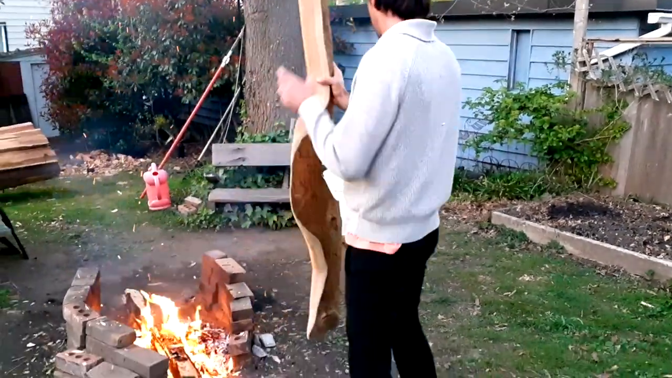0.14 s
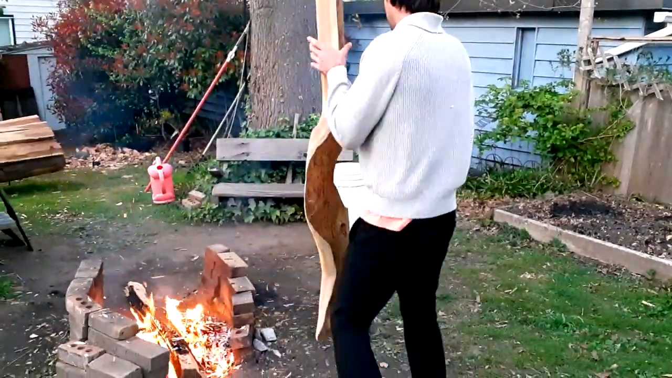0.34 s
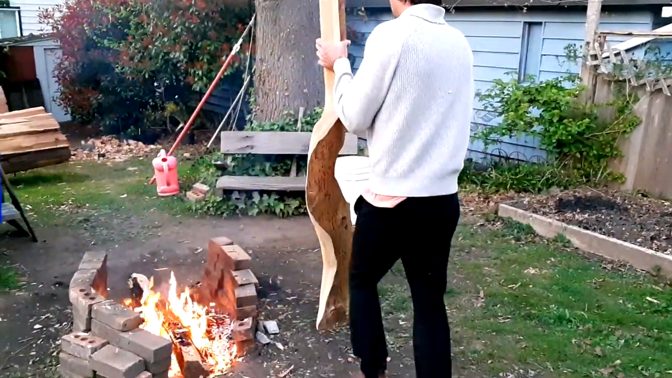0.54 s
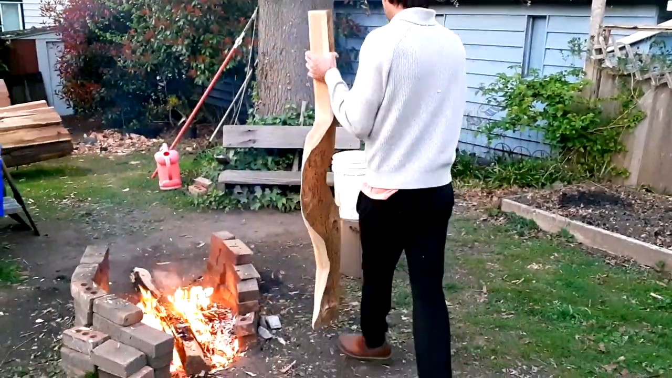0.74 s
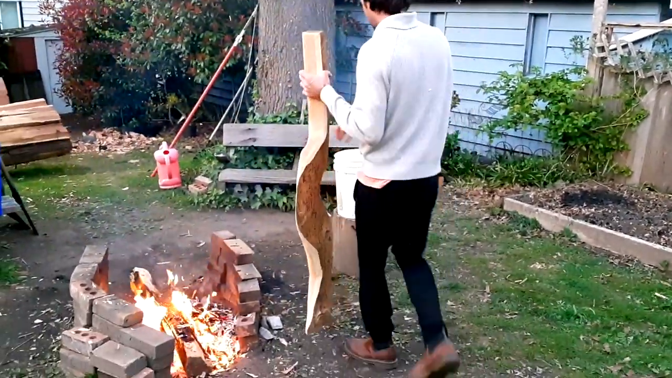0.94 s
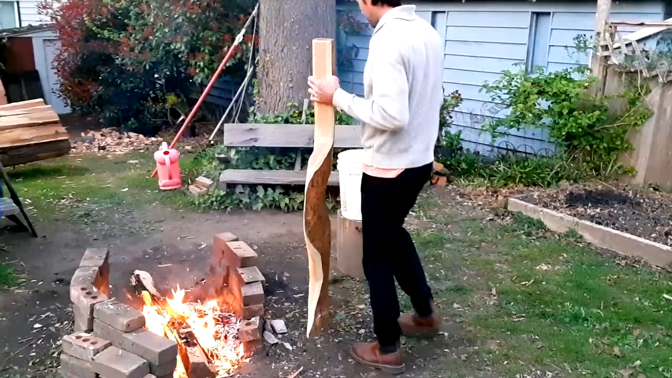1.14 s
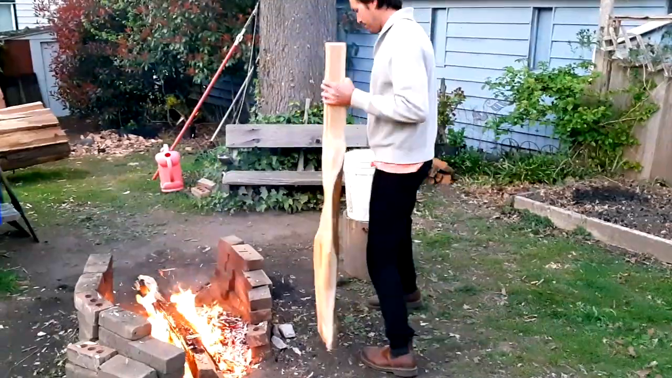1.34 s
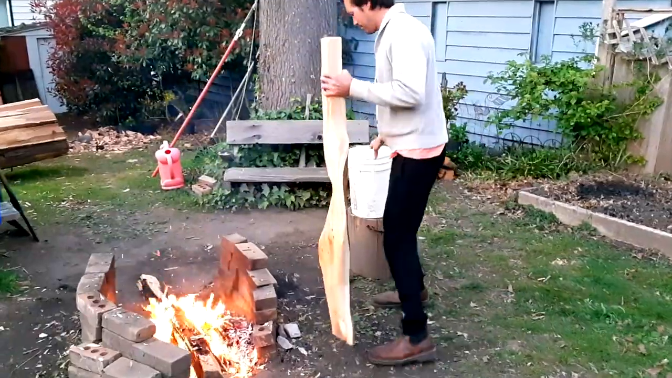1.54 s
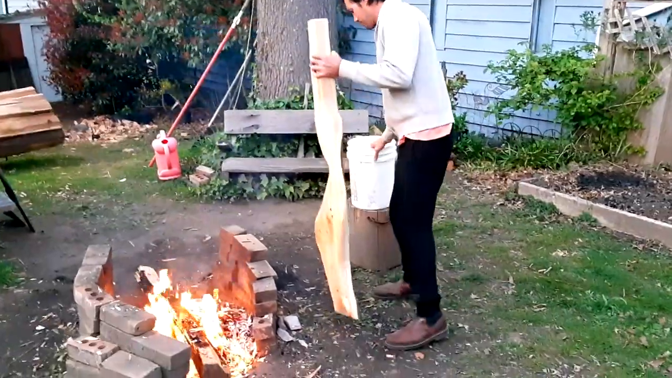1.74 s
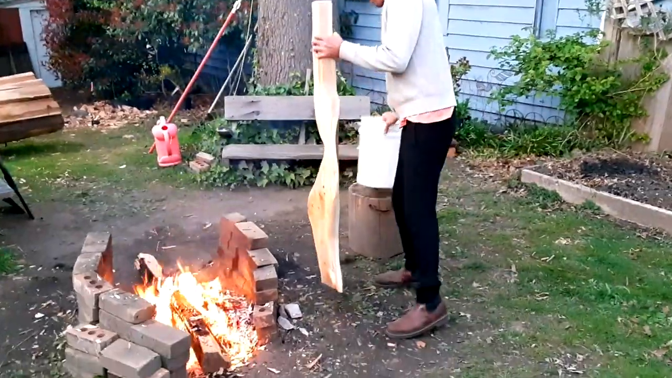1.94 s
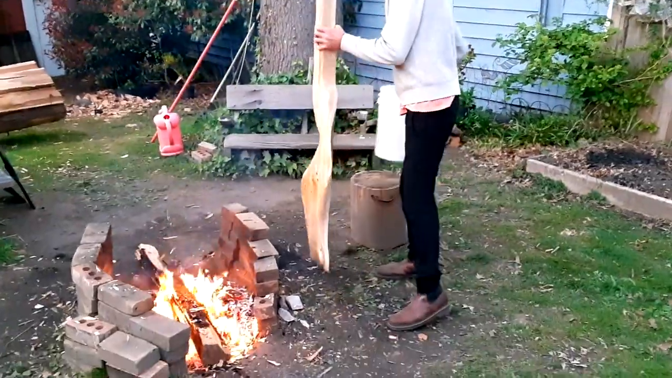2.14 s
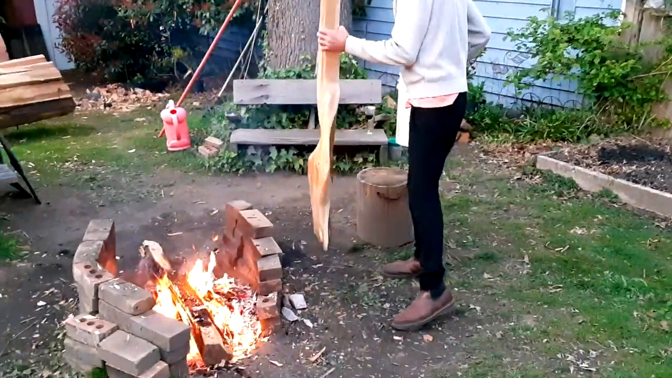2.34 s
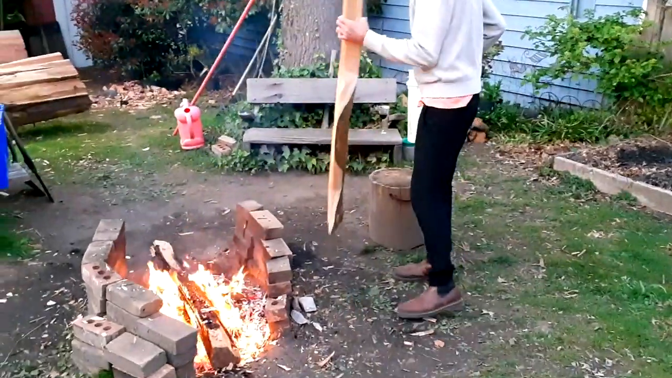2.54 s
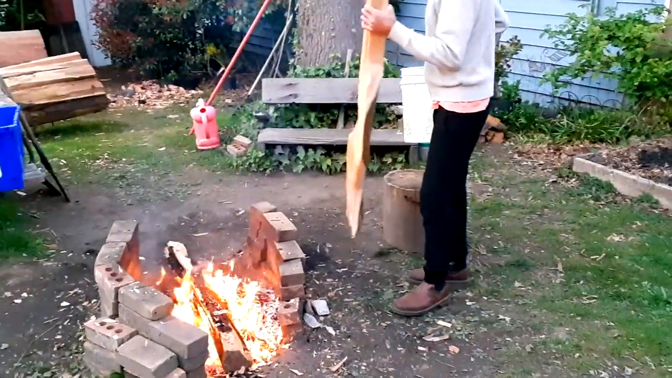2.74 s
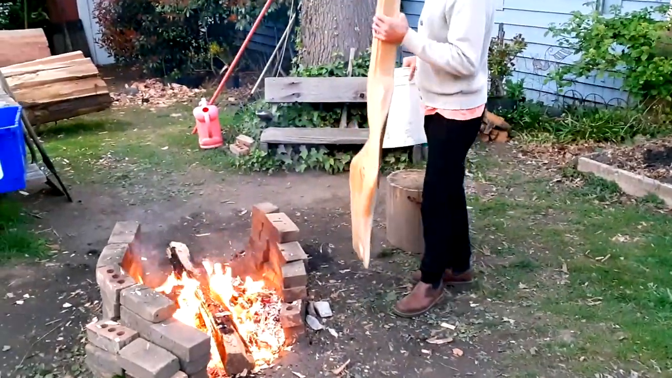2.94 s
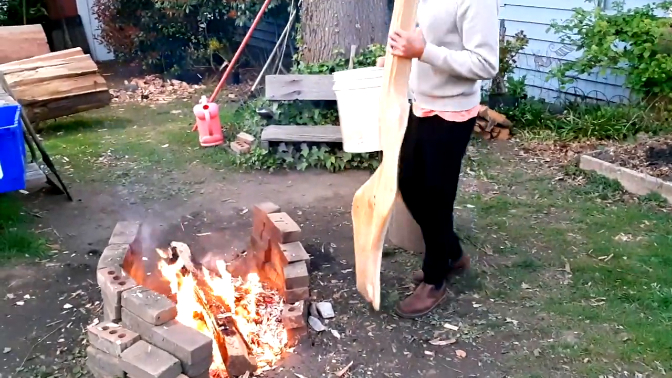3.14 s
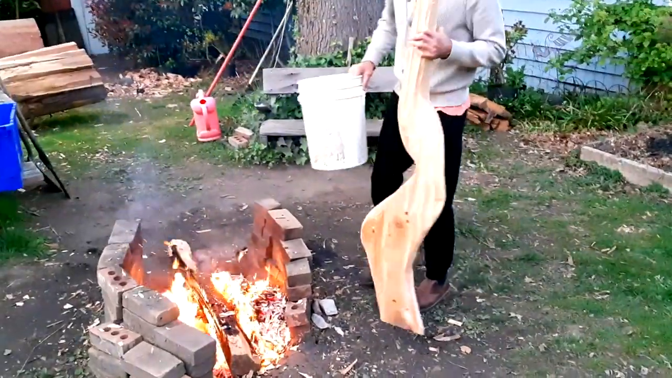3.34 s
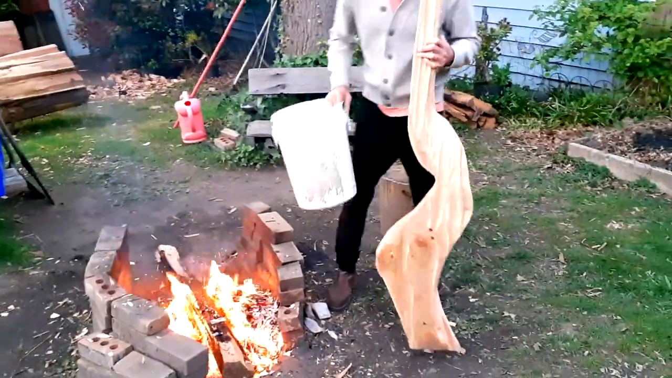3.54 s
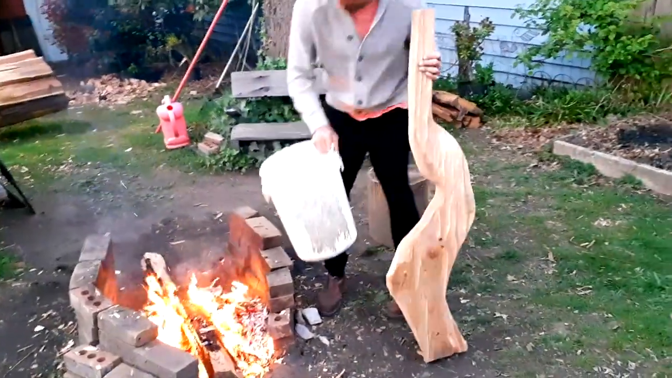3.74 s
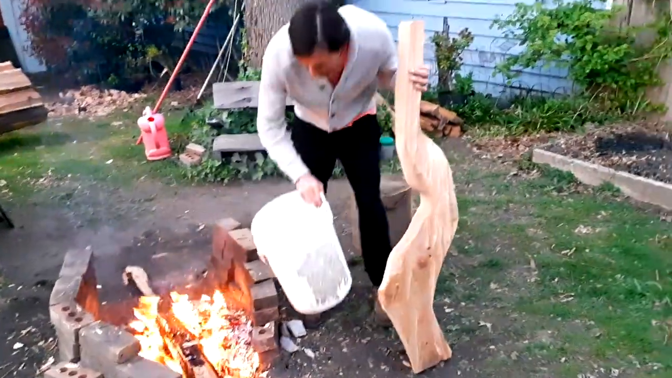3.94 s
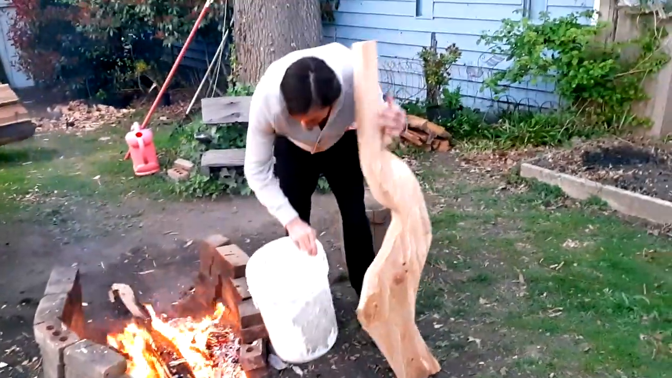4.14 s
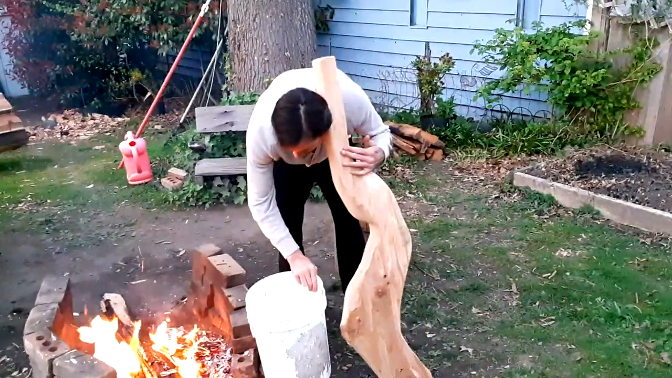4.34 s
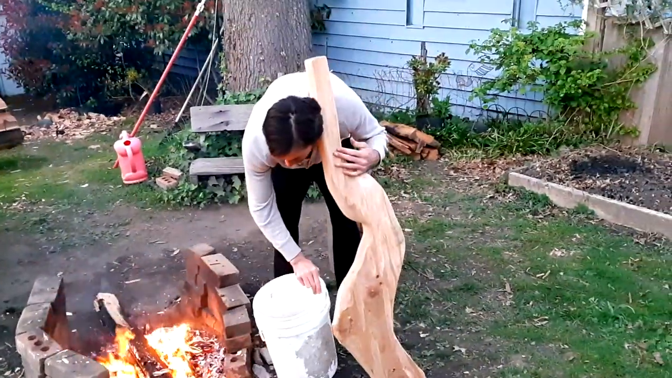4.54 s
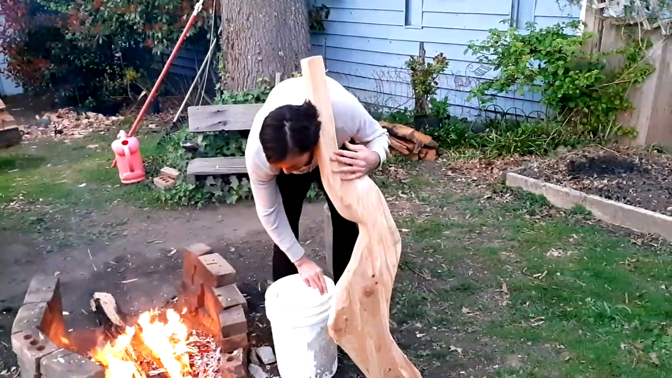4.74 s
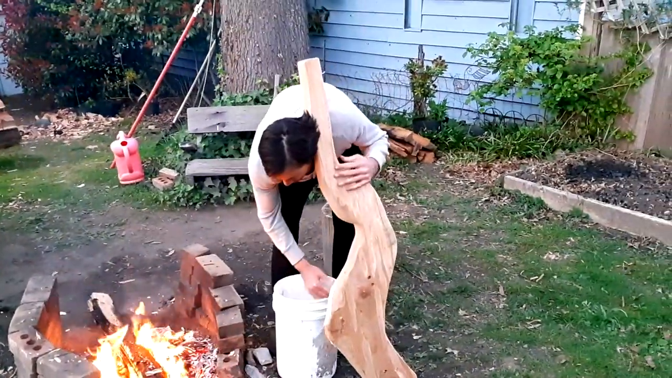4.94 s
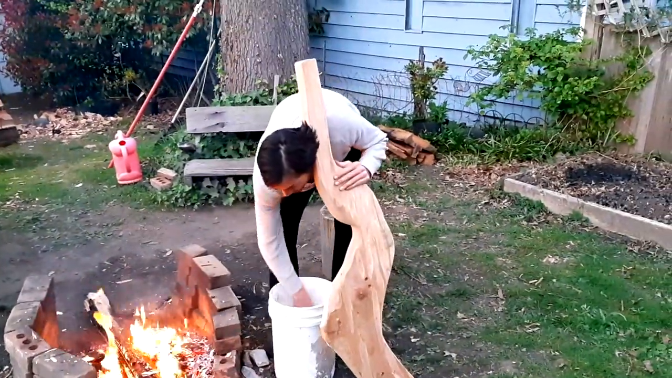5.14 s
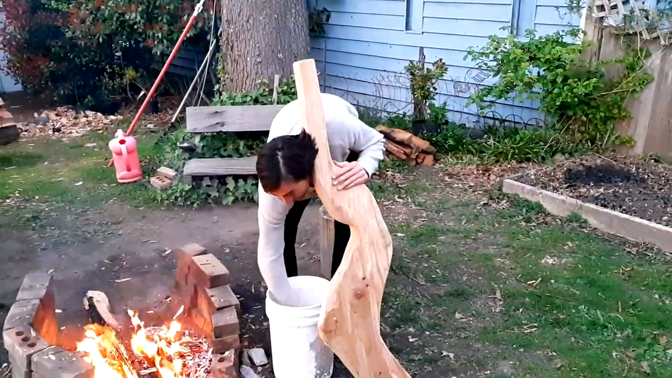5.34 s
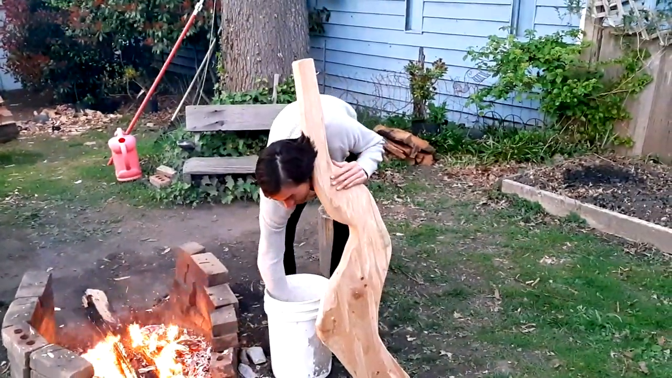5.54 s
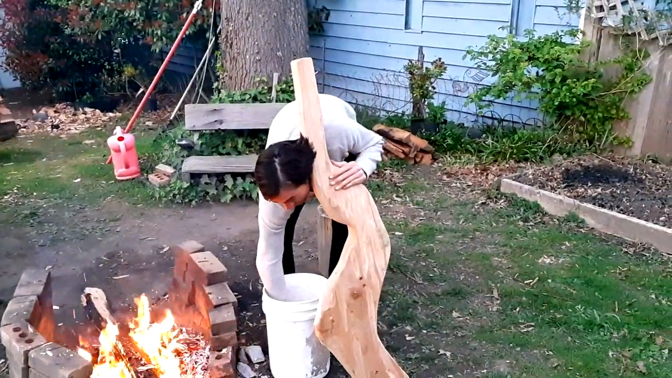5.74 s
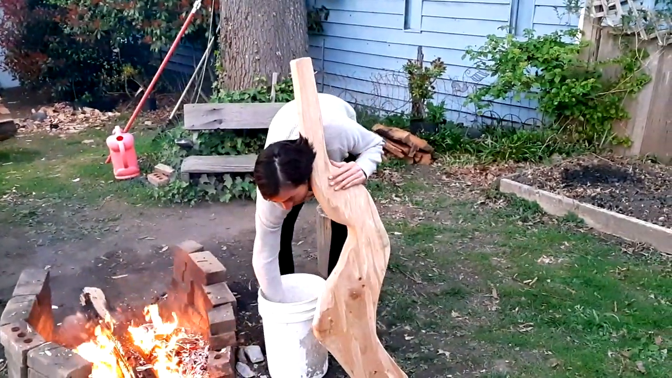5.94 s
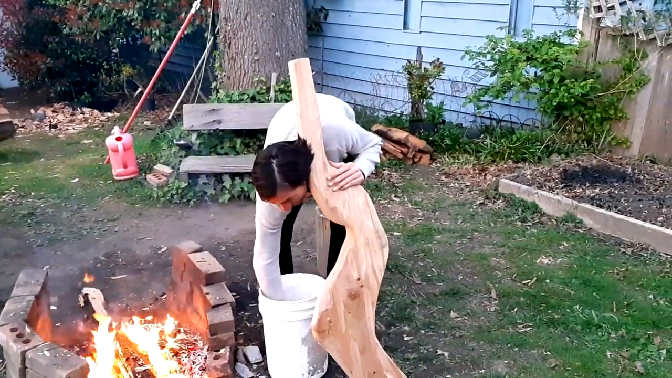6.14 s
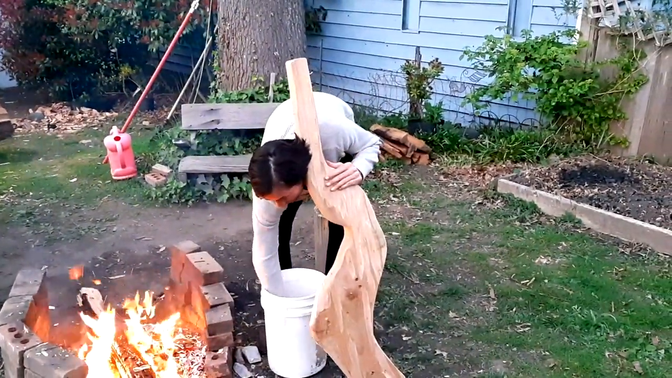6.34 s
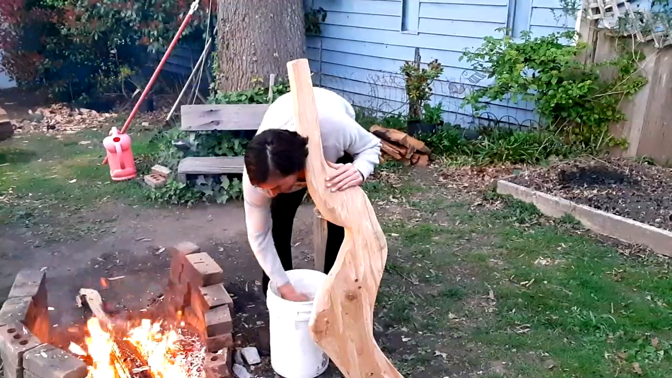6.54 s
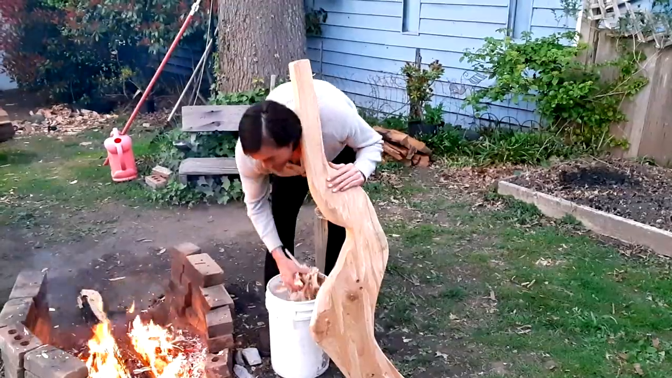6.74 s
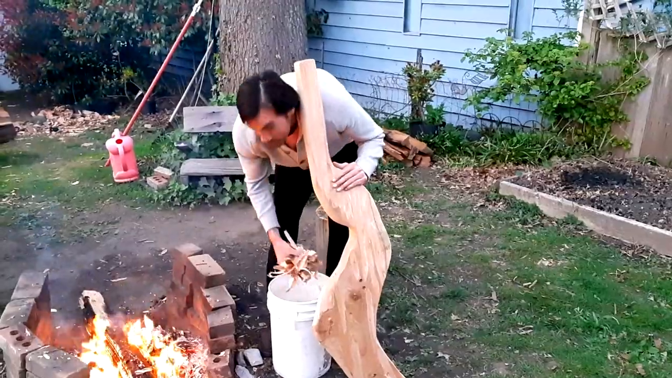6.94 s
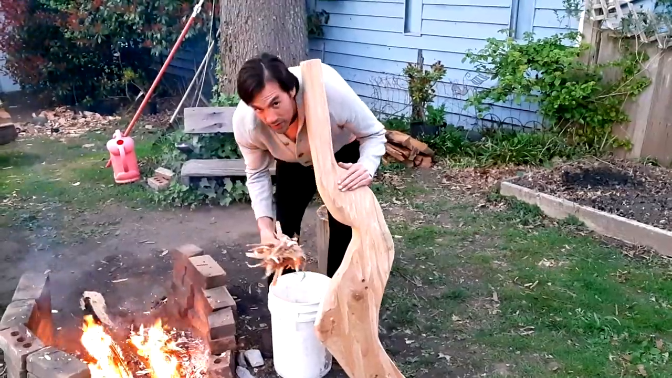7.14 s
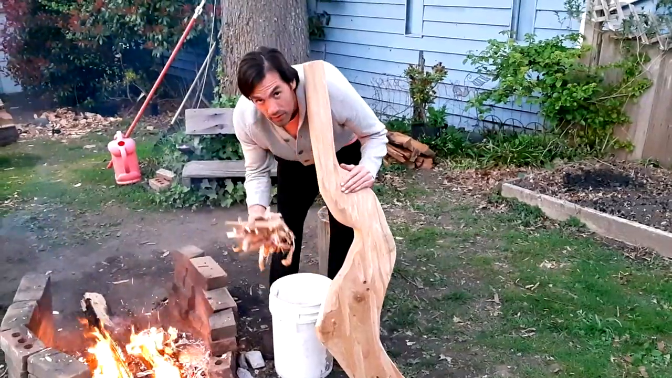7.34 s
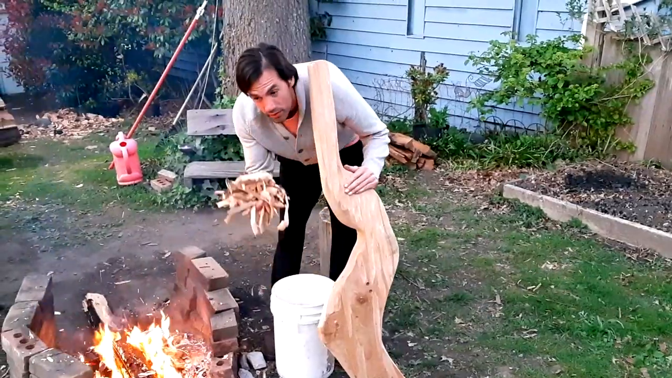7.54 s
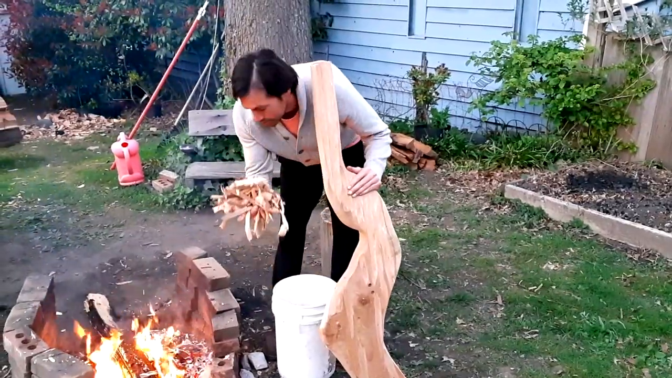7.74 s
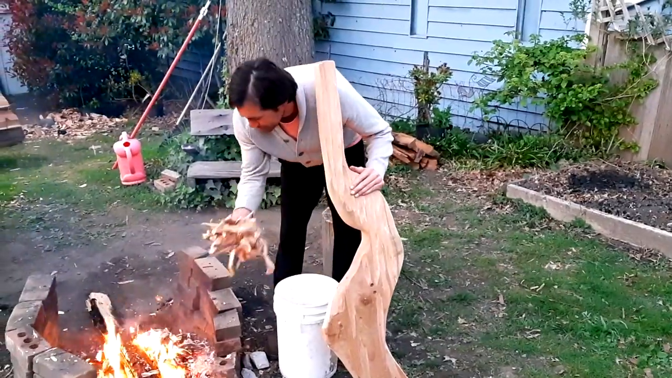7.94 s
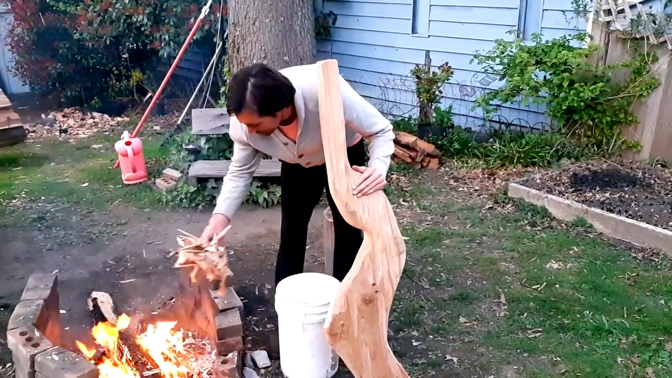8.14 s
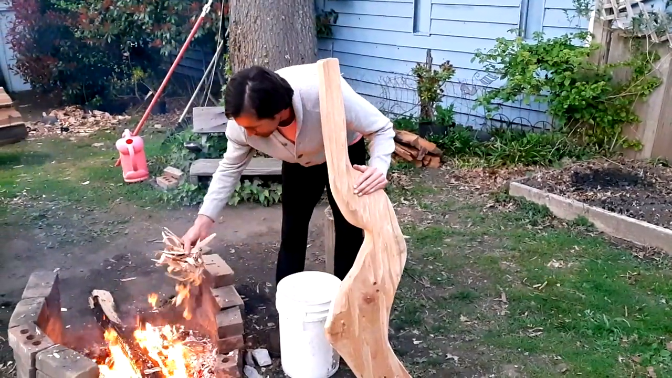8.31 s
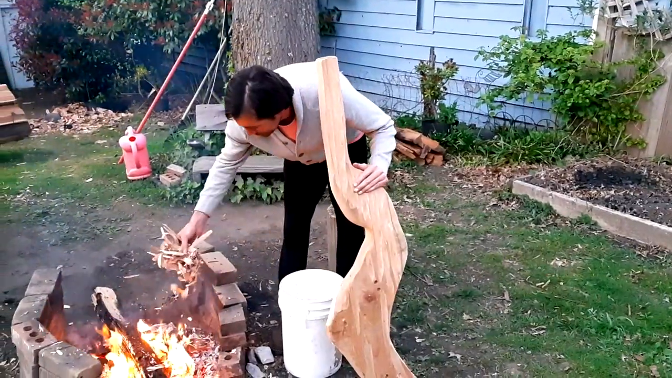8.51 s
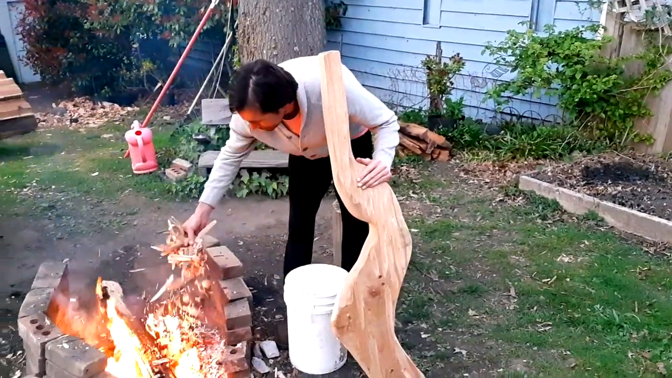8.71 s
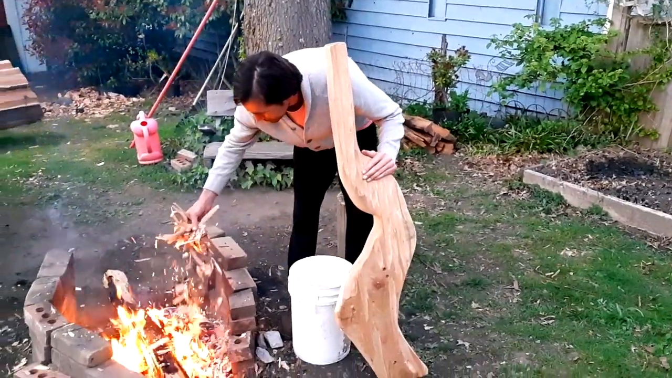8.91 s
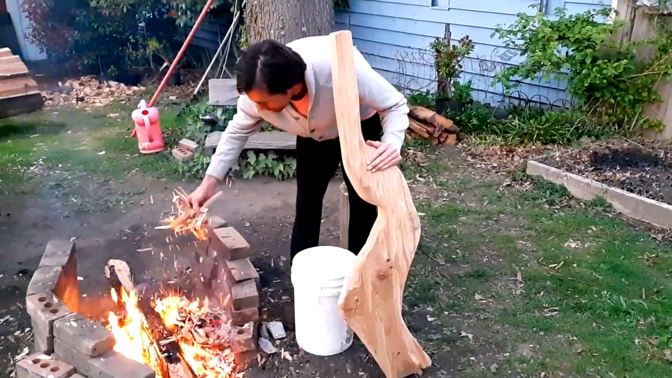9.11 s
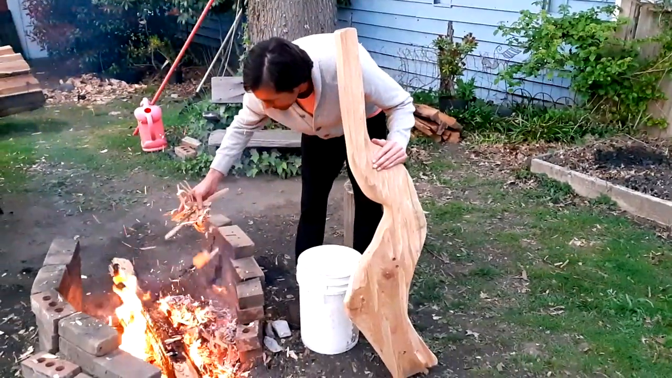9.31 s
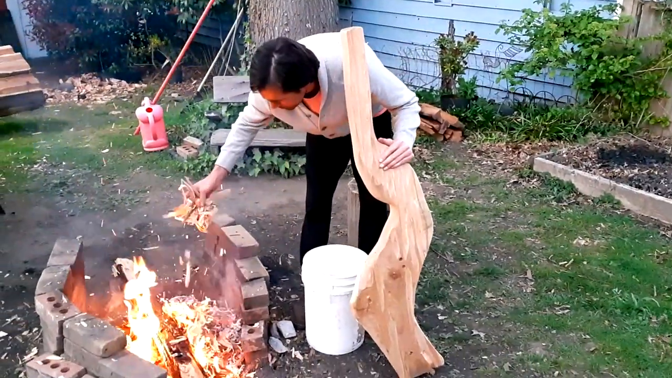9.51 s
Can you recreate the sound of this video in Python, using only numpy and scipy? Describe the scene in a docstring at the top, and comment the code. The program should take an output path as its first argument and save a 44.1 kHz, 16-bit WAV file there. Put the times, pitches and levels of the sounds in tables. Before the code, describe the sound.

A small wood fire crackles and pops sharply while footsteps scuff grass and a hand digs dry wood chips from a plastic bucket, then drops them.

```python
"""A wood fire hisses and pops in a brick pit in a small yard, left of the camera's two microphone ports.
Pops are bursts of noise in three bands, with copies off bricks and fences and a fading jet of gas.
Feet and a plank thud on the soil, a bucket is set down, a hand digs in its dry chips and drops them on the fire:
damped tones for contacts, grainy noise and small clicks for grass and chips, resonances for the bucket.
Rumble, far hums, a faint gliding whine and short whistles lie behind."""
import sys
import numpy as np
from scipy import signal
from scipy.fft import rfft, irfft, next_fast_len
from scipy.io import wavfile
from scipy.ndimage import uniform_filter1d, map_coordinates

SR = 44100
rng = np.random.default_rng(int(sys.argv[2]) if len(sys.argv) > 2 else 0)


def transcribe(signal):
    """Save signal, clipped to [-1, 1], as a 16-bit WAV file at the path in sys.argv[1]."""
    frames = np.atleast_2d(signal).T
    limited = np.clip(frames, -1, 1)
    pcm = np.round(limited * 32767).astype(np.int16)
    wavfile.write(sys.argv[1], SR, pcm)


N = 426447

# pops of the fire, levels before the trims of each layer:
# start_s, level_db, low_db, treble_db, hiss_db (the last three relative to level_db)
POP_EVENTS = [(0.027, -37, -15, -5.5, -17), (0.408, -37.5, 9.5, -27, -28), (0.4744, -26, -9, -14, -7.5),
              (0.6973, -18, -21, -14, -17), (0.7335, -40, 5.5, -2, -16), (0.7585, -40, 8.5, -15, -16.5),
              (0.942, -32, -33, -9, -1), (0.993, -12, -8, -13, -12), (1.2284, -32.5, -7.5, -2, -3),
              (1.3637, -36, -30, -18, -1), (1.4531, -27, -8, -3, -6), (1.944, -42.5, -3, -1, -9),
              (2.0715, -33.5, -3, -23, -10.5), (2.3107, -41, -27, -2, -2.5), (2.3894, -37, -34, -8, -12.5),
              (2.572, -43.5, -12, -6, -1), (2.6191, -15.5, -15.5, -1.5, -10.5), (2.706, -44.5, 4, -4, -27),
              (2.754, -19, -11, -16.5, -14), (3.031, -54, 8, -5, -10.5), (3.1355, -33.5, -8, -11, -5),
              (3.1463, -7, -12, -18, -13.5), (3.313, -13.5, -6.5, -15, -27.5), (3.5915, -47, 6, -10, -12.5),
              (3.6408, -51.5, 10, 13, -5), (4.1991, -38.5, -36, -6, -27), (4.237, -32, -36, -4.5, -8.5),
              (4.3997, -27.5, -17, -6.5, -15), (4.439, -43.5, 5.5, -22, -16), (4.478, -36, -8, -19, -36),
              (4.697, -23.5, -4, -12, -28), (5.024, -21.5, -34, -13, -27), (5.4295, -13, -41, -2.5, -11),
              (5.544, -28.5, 1.5, -24, -23), (5.5913, -16, -8, -14, -23), (5.758, -30.5, -3, -4, 0),
              (5.8121, -19.5, -25, -10, -25), (6.005, -11, -8, -17.5, -13), (6.0733, -19.5, -5.5, -9, -20),
              (6.1067, -16, -5, -4.5, -19.5), (6.383, -21, -41, -16, -38), (6.577, -20, -7, -11, -8),
              (6.702, -28, -10, -1, -31), (6.762, -36.5, 4.5, 5.5, -27), (6.884, -28, -16, -23, -16),
              (7.044, -18.5, 0.5, -8.5, -18), (7.051, -19, -8, -18.5, -29.5),
              (7.104, -39, -24.5, -11.5, -18), (7.1455, 0, -16, -16, -12), (7.3183, -29.5, 2.5, -28, -40),
              (7.7631, -31.5, -26, -4, -9), (8.0547, -29.5, -5.5, -27, -9.5), (8.0673, -28, -21, -12, -19),
              (8.337, -32, -45, -4.5, -38), (8.4354, -23.5, -20, -7.5, -14), (8.4554, -28, -4, -4, -35),
              (8.4811, -36, -9, -7, -1), (8.657, -39, -7.5, -4, -1.5), (8.717, -43.5, -4, 1, -2),
              (8.781, -42, -20, -6, -21), (8.808, -37, -10, -3, -1), (8.8228, -33.5, -3, -1, -19),
              (8.873, -38, 1, 0, -17), (8.891, -33, 3.5, 2, -16.5), (8.9144, -25, -17, -4, -8),
              (8.973, -35.5, -7.5, 2, 0), (9.2093, -30, -30, -9, -24), (9.49, -36.5, -3.5, -1, -15),
              (9.5685, -32.5, -38, -29, -15)]
# likeness of the two ports for fire, grass and falling chips: freq_hz, correlation
FIRE_ALIKE = [(60, 0.94), (300, 0.93), (1000, 0.37), (3000, 0.13), (8000, 0.026), (15000, 0.35)]


def amp(db):
    """dB to gain."""
    return 10 ** (np.asarray(db) / 20)


def unit(x):
    """Scaled to rms 1."""
    return x / np.sqrt(np.mean(x ** 2) + 1e-20)


def along(points, hz):
    """Reads (Hz, value) points on a log frequency axis."""
    f, v = np.transpose(points)
    return np.interp(np.log(hz + 1), np.log(f + 1), v)


def curves(rows):
    """One value per sample for each column after the time."""
    s, *cols = np.transpose(rows)
    return [np.interp(np.arange(N) / SR, s, c) for c in cols]


def only_while(rows):
    """A dB curve that sinks to -100 outside its own span."""
    quiet = [-100] * (len(rows[0]) - 1)
    return curves([(rows[0][0] - .1, *quiet), *rows, (rows[-1][0] + 0.092, *quiet)])


def wobble(rate):
    """A smooth random curve, rate knots a second."""
    return map_coordinates(rng.standard_normal(int(N * rate / SR) + 4), [np.arange(N) * rate / SR])


def add(track, s, sound):
    """Adds a sound at a time."""
    start = round(s * SR)
    track[..., start:start + sound.shape[-1]] += sound


def swells(rows):
    """A gain that swells and fades once for each (start_s, peak_db, rise_s)."""
    out, t = np.zeros(N + SR), np.arange(SR // 2) / SR
    for s, db, rise in rows:
        add(out, s, amp(db) * (t / rise * np.exp(1 - t / rise)) ** 2)
    return out[:N]


def filtered(x, response):
    """x shaped by a complex response of frequency."""
    m = next_fast_len(N + 8192)
    return irfft(rfft(x, m) * response(np.fft.rfftfreq(m, 1 / SR)), m)[..., :N]


def modes(table):
    """The causal response of (Hz, width Hz, dB) resonances, with alternating signs."""
    def response(f):
        total = 0
        for k, (centre, width, db) in enumerate(table):
            damping = 1j * f * width
            total = total + (-1) ** k * amp(db) * damping / (centre * centre - f * f + damping)
        return total
    return response


def fuzzy(table, source):
    """A noise passed twice through narrow resonances; rms 1."""
    return unit(filtered(source, lambda hz: modes(table)(hz) ** 2))


def spread(pair, alike, lag_s, pan_db):
    """Mixes a pair to left and right; unrelated noises get the set likeness; the left is earlier and louder."""
    shadow_hz = 400  # well below it the camera shades the far port only half as much
    m = next_fast_len(N + 8192)
    hz = np.fft.rfftfreq(m, 1 / SR)
    turn = np.arccos(np.clip(along(alike, hz), -1, 1)) / 2
    mid, side = rfft(pair, m) * [np.cos(turn), np.sin(turn)]
    shade_db = pan_db * (1 + hz / (hz + shadow_hz)) / 2
    lead = amp(shade_db / 2) * np.exp(1j * np.pi * hz * lag_s)  # half to each port
    return irfft([(mid + side) * lead, (mid - side) / lead], m)[:, :N]


def grit(per_s, spread_db, life_s, share):
    """Two noises, a share of whose power comes in short shared grains of uneven size."""
    sizes = amp(spread_db * np.minimum(rng.exponential(size=N), 2.5))
    starts = (rng.random(N) < per_s / SR) * sizes
    grains = unit(signal.lfilter([1], [1, -np.exp(-1 / SR / life_s)], starts))
    return np.sqrt(1 - share + share * grains ** 2) * rng.standard_normal((2, N))


def clicks(per_s, centre_hz, octaves, cycles, spread_db):
    """Small chips tapped at random: each rings a few cycles at its own pitch; rms 1."""
    at, pitch, size, side = rng.random((round(per_s * N / SR), 4)).T
    hz = centre_hz * 2 ** (octaves * (2 * pitch - 1))[:, None]
    t = np.arange(SR // 60) / SR
    ring = np.sin(2 * np.pi * hz * t) * np.exp(-t * hz / cycles) * (1 - np.exp(-t / 0.000067))
    ring = ring * amp(-spread_db * np.log(size + 0.092))[:, None]
    index = ((at * N).astype(int)[:, None] + np.arange(len(t))).ravel()
    pair = []
    for turn in (np.cos(2 * np.pi * side), np.sin(2 * np.pi * side)):
        track = np.bincount(index, (ring * turn[:, None]).ravel())[:N]
        pair.append(np.pad(track, (0, N - len(track))))
    return unit(np.array(pair))


def patchy(x, depth_db, bins, frames):
    """Random patches of gain over pitch and time, so that each moment has its own colour."""
    z = signal.stft(x, nperseg=256)[2]
    field = uniform_filter1d(rng.standard_normal(z.shape[1:]), bins, 0)
    field = uniform_filter1d(field, frames, 1)
    mean_db = depth_db ** 2 * np.log(10) / 20  # keeps the mean power
    return signal.istft(z * amp(depth_db * unit(field) - mean_db), nperseg=256)[1][:, :N]


def tail(fade):
    """A stereo noise tail, left energy 1; each frequency dies at its own speed."""
    hz, t, z = signal.stft(rng.standard_normal((2, SR // 4)), SR, nperseg=128)
    h = signal.istft(z * amp(-60 * t / along(fade, hz)[:, None]), SR, nperseg=128)[1]
    return h / np.linalg.norm(h[0])


def blows(table, noisy, wide, rise):
    """Short contacts: a damped tone inside a puff of noise around its pitch, rising over a part of a cycle."""
    out, t = np.zeros((2, N + SR)), np.arange(SR // 5) / SR
    for s, db, hz, t60 in table:
        band = signal.butter(2, [hz / wide, hz * wide], "band", fs=SR, output="sos")
        puff = unit(signal.sosfilt(band, rng.standard_normal((2, len(t)))))
        ring = np.sin(2 * np.pi * hz * t) + noisy * puff  # one tone for both rows, a puff for each
        ring = ring * amp(-60 * t / t60) * (1 - np.exp(-t * hz / rise)) ** 2
        add(out, s, amp(db + 1.0) * ring / np.abs(ring).max())
    return out[:, :N]


def pops():
    """A gas pocket bursts: a crack of a few ms, copies off the bricks and fences, then gas hisses out and fades."""
    # lower, middle and treble band: low_edge_hz, high_edge_hz
    edges_hz = [(220, 2600), (2600, 7800), (7800, 15900)]
    # fade of the gas jet in the same three bands: t60_s
    jet_t60_s = [0.39, 0.33, 0.058]
    # copies off bricks and fences, before each pop's own openness: delay_s, level_db
    wall_copies = [(.006, -10.5), (.0095, -16), (0.016, -24.5), (.023, -13.5)]
    bands = [signal.butter(order, edges, "band", fs=SR, output="sos")
             for order, edges in zip((1, 2, 3), edges_hz)]
    fire, gas = np.zeros((2, N + SR)), np.zeros((2, N + SR))
    t, slow = np.arange(SR // 40) / SR, np.arange(SR // 5) / SR
    shapes = [amp(-60 * t / t60) * (1 - np.exp(-t / 0.0022)) ** 2 for t60 in (.01, .0055, .0045)]
    for s, db, low_db, top_db, hiss_db in POP_EVENTS:
        crack = 0
        for band, shape, level in zip(bands, shapes, (low_db, -1.5, top_db + 11.0)):
            part = signal.sosfilt(band, rng.standard_normal((2, len(t))) * shape)
            crack = crack + amp(db + level) * part / np.abs(part).max()
        add(fire, s, crack)
        open_db = 0.42 * (hiss_db + 4.0)  # an open pop hisses and echoes more than a buried one
        for delay, wall_db in wall_copies:
            add(fire, s + delay, amp(wall_db + open_db) * rng.permutation(crack))  # sides may swap
        noise = rng.standard_normal((2, len(slow))) * (1 - np.exp(-slow / 0.00078))
        levels = (1.48 * low_db + 18.5, 1.5, 2.1 * top_db - 10.0)
        jet = sum(amp(level - 60 * slow / t60) * signal.sosfilt(band, noise)
                  for level, t60, band in zip(levels, jet_t60_s, bands))
        add(gas, s, amp(db + hiss_db - 16.5) * jet)
    gas = patchy(gas[:, :N], depth_db=2.5, bins=7, frames=6)
    return spread(fire[:, :N] + gas, FIRE_ALIKE, lag_s=0.0001, pan_db=3.0)


def stirred_fizz():
    """Each pop leaves the embers fizzing for a moment."""
    linger_db, linger_t60_s = -11.5, 0.23  # relative to the pop's hiss level
    out, t = np.zeros(N + SR), np.arange(SR // 2) / SR
    for s, db, _, _, hiss_db in POP_EVENTS:
        fade_db = linger_db - 60 * t / linger_t60_s
        add(out, s, amp(db + hiss_db + fade_db) * (1 - np.exp(-t / 0.0067)))
    return out[:N]


def rustle():
    """Feet scrape the grass and chips shift and trickle down, a soft dense rush; the fire fizzes with finer grains."""
    # fizz of the flames: time_s, level_db
    flame_fizz = [(0, -66), (.45, -69.5), (1.8, -63), (2.4, -68), (3.4, -68.5), (4.16, -69.5), (4.4, -61),
                  (5.0, -63.5), (7.4, -69.5), (8.1, -68), (8.4, -54.5), (8.55, -56.5), (9.15, -55.5),
                  (9.3, -55), (9.42, -56), (9.58, -57), (9.67, -46)]
    # feet brushing the grass: start_s, peak_db, rise_s
    foot_rows = [(.2, -63, 0.081), (.52, -67.5, 0.083), (.74, -62, 0.073), (1.0, -46, 0.035),
                 (1.25, -54, 0.24), (1.42, -48.5, 0.026), (1.55, -52.5, 0.11), (1.615, -46.5, 0.039),
                 (1.645, -51, 0.021), (1.69, -53, 0.0085), (2.68, -63, 0.094), (3.5, -57, 0.023),
                 (3.75, -57.5, 0.18), (3.95, -65, 0.018)]
    # chips let fall on the fire: start_s, peak_db, rise_s
    fall_rows = [(8.43, -61.5, 0.075), (9.002, -52, 0.014), (9.0, -61.5, 0.058), (9.145, -58.5, 0.02),
                 (9.1844, -65.5, 0.026), (9.41, -57.5, 0.05), (9.6544, -56.5, 0.012)]
    # colour of the fizz up to 15.8 kHz, then the band limit of the sound file:
    # freq_hz, relative level_db per Hz
    fizz_colour = [(300, -12.5), (1000, -23), (2500, 1.5), (5000, -2.5), (15800, 4), (16100, -24.5)]
    # colour of the dry rush of chips and still grass, then the file's band limit above 15.8 kHz:
    # freq_hz, relative level_db per Hz
    rush_colour = [(400, -2), (1000, -0.5), (2000, -8.5), (3500, -8.5), (5500, -7), (9000, -8.5),
                   (15800, -12.5), (16100, -48.5)]
    # a shoe dragged over grass and soil: freq_hz, width_hz, relative level_db
    sole_modes = [(1090, 530, 2.5), (2450, 520, 4.5), (3860, 980, 5.5), (6100, 22000, -10.5)]
    hand_rush_db, hand_fizz_db, still_db = -8.5, -9.5, -73  # moving chips; the grass at rest
    foot_fizz_db, fall_fizz_db = -12, 9.5  # fine grains over each rush
    rush_flutter_db, fizz_flutter_db = 3, 2.5  # random unevenness
    feet, falls, hand = swells(foot_rows), swells(fall_rows), stirring()

    rush = grit(per_s=250, spread_db=4.5, life_s=.002, share=.45)
    scrape = grit(per_s=220, spread_db=3.5, life_s=.003, share=.45)
    fizz = grit(per_s=200, spread_db=4.5, life_s=.0012, share=.33)
    rush_gain = falls + amp(hand_rush_db) * hand + amp(still_db)
    rush_gain = rush_gain * amp(rush_flutter_db * wobble(22))
    fizz_gain = amp(curves(flame_fizz)[0]) + amp(hand_fizz_db) * hand + stirred_fizz()
    fizz_gain = fizz_gain * amp(fizz_flutter_db * wobble(13))
    fizz_gain = fizz_gain + amp(foot_fizz_db) * feet + amp(fall_fizz_db) * falls

    rush = rush_gain * unit(filtered(rush, lambda hz: amp(along(rush_colour, hz))))
    scrape = feet * unit(filtered(scrape, modes(sole_modes)))
    fizz = fizz_gain * unit(filtered(fizz, lambda hz: amp(along(fizz_colour, hz))))
    # landing chips tick
    ticks = falls * clicks(per_s=320, centre_hz=4200, octaves=1, cycles=2, spread_db=4)
    mixed = patchy(rush + scrape + fizz, depth_db=2, bins=6, frames=8) + ticks
    return spread(mixed, FIRE_ALIKE, lag_s=0.00011, pan_db=2.5)


def stirring(steady_db=0, column=None):
    """The hand's gain: steady stirring plus strokes, optionally weighted by one bucket column."""
    # the hand sunk in the chips: time_s, level_db
    steady = [(4.3, -68), (4.56, -86), (4.8, -52.5), (4.99, -66), (5.3, -51.5), (5.7, -50.5), (5.87, -55.5),
              (5.99, -59), (6.05, -53), (6.2, -49), (6.7, -46.5), (7.1, -50.5), (7.3, -91), (7.42, -87)]
    # its strokes: start_s, peak_db, rise_s, air_column_db, wall_db (the last two relative to peak_db)
    stroke_rows = [(4.33, -63, 0.027, -3, 1), (4.46, -61.5, 0.056, -11, 0.5),
                   (4.63, -41, 0.032, -10.5, -4.5), (4.831, -50.5, 0.037, -11, -5.5),
                   (5.018, -46.5, 0.014, -12, -4), (5.07, -56.5, 0.051, -0.5, 0.5),
                   (5.33, -57.5, 0.087, 5.5, 4.5), (5.46, -51, 0.066, 4.5, -7),
                   (5.743, -42, 0.022, -23, -28), (5.785, -53, 0.023, -18, -12),
                   (5.9, -48.5, 0.041, -2, -1), (6.13, -51.5, 0.066, -29, -13), (6.29, -49, 0.049, -25, -3),
                   (6.69, -51, 0.042, -8, 4.5), (6.822, -46, 0.035, -28, -21),
                   (6.89, -48.5, 0.065, -36, -20), (7.21, -49.5, 0.027, -26, -9),
                   (7.289, -46, 0.026, -7, -7.5)]
    strokes = [(row[0], row[1] + (row[column] if column else 0), row[2]) for row in stroke_rows]
    return amp(only_while(steady)[0] + steady_db) + swells(strokes)


def chips():
    """The hand stirs the heap: chips rub and tap in clumps, each with its own colour."""
    # body of the heap: freq_hz, width_hz, relative level_db
    heap_modes = [(1060, 740, -5), (1270, 190, 0.5), (1525, 95, -1), (2223, 110, 0), (3020, 670, -6),
                  (4660, 6900, -20.5)]
    rub = filtered(grit(per_s=110, spread_db=4.5, life_s=.006, share=.5), modes(heap_modes))
    rub = unit(patchy(rub, depth_db=4, bins=4, frames=7))
    taps = clicks(per_s=220, centre_hz=1700, octaves=1.1, cycles=5, spread_db=4.5)
    mixed = unit(rub + amp(-4.5) * taps)
    return stirring() * amp(0.97 * wobble(25)) * mixed


def bucket():
    """The hand shakes the bucket: air column and plastic wall hum, each wall mode drifting in strength on its own."""
    # plastic wall: freq_hz, width_hz (of one of two passes), relative level_db
    wall_modes = [(463, 36, -1.5), (560, 60, -3.5)]
    # air in the bucket: freq_hz, width_hz (of one of two passes), level_db (cancelled by scaling to rms 1)
    air_modes = [(197, 42, 0)]
    shake = grit(per_s=44, spread_db=-9.5, life_s=0.013, share=0.15)
    air_gain, wall_gain = stirring(steady_db=-9.5, column=3), stirring(steady_db=-12.5, column=4)
    panels = unit(sum(amp(mode[2] + 3.5 * wobble(12)) * fuzzy([mode], shake) for mode in wall_modes))
    hum = air_gain * fuzzy(air_modes, shake) + wall_gain * panels
    return patchy(hum, depth_db=2.5, bins=1, frames=12)


def knocks():
    """Logs snap, dry chips clack on each other and on the bucket; the yard answers with a noise tail."""
    # woody knocks, 1 dB under their dry peak: start_s, level_db, pitch_hz, t60_s
    knock_rows = [(0.758, -34.5, 2500, 0.04), (0.942, -22, 2340, 0.015), (1.257, -32.5, 2820, 0.022),
                  (1.3635, -25, 2480, 0.014), (1.365, -45, 3850, .015), (1.453, -29.5, 2730, 0.036),
                  (2.073, -38, 3180, 0.022), (3.648, -32, 2900, 0.021), (4.636, -26.5, 1476, 0.054),
                  (4.662, -32.5, 917, 0.19), (4.698, -28, 1190, 0.028), (4.785, -45, 2120, 0.15),
                  (4.849, -39.5, 1284, 0.27), (5.028, -24, 1500, 0.029), (5.1717, -41, 1500, 0.046),
                  (5.5039, -41, 1300, .03), (5.532, -31, 2150, 0.036), (5.653, -36, 2380, 0.086),
                  (5.765, -33, 980, 0.05), (5.799, -37.5, 916, 0.18), (6.06, -26.5, 930, 0.055),
                  (6.1759, -43, 1530, .03), (6.194, -36, 4230, .02), (6.308, -36, 1420, 0.052),
                  (6.404, -29, 1340, 0.037), (6.4673, -30.5, 1430, 0.092), (6.54, -29, 1020, 0.043),
                  (6.576, -30, 1620, 0.036), (6.608, -30, 1300, 0.031), (6.692, -30.5, 2580, 0.058),
                  (6.709, -24.5, 1220, 0.039), (6.728, -22, 1170, 0.022), (6.742, -36.5, 1510, 0.036),
                  (6.759, -25, 1730, 0.037), (6.796, -27, 1314, 0.15), (6.832, -21.5, 1475, 0.042),
                  (6.915, -31.5, 2320, 0.13), (7.103, -23, 2940, 0.048), (7.266, -35.5, 998, 0.091),
                  (7.317, -24.5, 1270, 0.029), (7.459, -33.5, 2480, 0.027), (7.645, -55, 1126, 0.14),
                  (8.067, -35.5, 3550, 0.023), (8.429, -38.5, 2910, 0.059), (8.5088, -34, 3520, 0.022),
                  (8.667, -47, 1080, 0.021), (8.914, -30.5, 2350, 0.051), (9.0096, -33.5, 5000, .02),
                  (9.055, -42, 1060, 0.034)]
    # fade of the yard: freq_hz, t60_s
    yard_fade = [(300, 0.31), (2000, 0.4), (6000, 0.12), (15000, 0.2)]
    dry_knocks = blows(knock_rows, noisy=.9, wide=1.9, rise=.6)
    return dry_knocks + amp(-13) * signal.fftconvolve(dry_knocks, tail(yard_fade), axes=1)[:, :N]


def thuds():
    """Feet, plank and bucket meet the soil in soft heavy contacts: damped low tones with a little noise."""
    # contacts, 1 dB under their dry peak: start_s, level_db, pitch_hz, t60_s
    thud_rows = [(0.72, -43.5, 252, 0.048), (0.985, -43, 255, 0.062), (1.254, -44.5, 290, 0.046),
                 (1.44, -44.5, 330, 0.046), (1.744, -33.5, 214, 0.031), (1.76, -49.5, 195, 0.13),
                 (1.8, -47.5, 191, 0.19), (3.493, -48, 180, 0.095), (3.658, -49.5, 96.5, 0.088),
                 (4.338, -50, 137, 0.056), (4.653, -38, 105, 0.083), (5.767, -51, 493, 0.24),
                 (6.328, -40, 121, 0.18), (6.5755, -34, 450, 0.02), (6.738, -38, 217, 0.032),
                 (8.07, -48.5, 169, 0.048), (8.445, -50, 218, 0.061), (8.885, -46, 340, 0.11),
                 (9.459, -50, 125, 0.15)]
    return blows(thud_rows, noisy=.35, wide=1.9, rise=.45)


def cheeps():
    """Short thin whistles: sines whose phase strays at random, a little unsteady."""
    # whistles, 2 dB under their dry level: start_s, level_db, pitch_hz, length_s
    cheep_rows = [(9.035, -59, 2580, 0.058), (9.146, -56, 2560, 0.022), (9.185, -46.5, 2535, 0.021)]
    out = np.zeros((2, N + SR))
    for s, db, hz, length in cheep_rows:
        t = np.arange(round(length * SR)) / SR
        drift = np.cumsum(0.07 * rng.standard_normal(len(t)))  # radians
        tone = np.sin(2 * np.pi * hz * t + drift)
        add(out, s, amp(db + 2.0) * tone * np.sin(np.pi * t / length) ** 0.43)
    return out[:, :N]


def whine():
    """A fuzzy far tone that glides and wavers in strength, over a dull wash."""
    # the glide: time_s, pitch_hz, level_db
    glide = [(7.45, 765, -80), (7.84, 772, -72), (8.1, 780, -76), (8.4, 805, -73), (9.1, 820, -73.5)]
    # dull noise under it: freq_hz, width_hz (of one of two passes), level_db relative to the tone
    wash_band = [(660, 240, -2)]
    s, hz, db = np.transpose(glide)
    turns = np.cumsum(np.interp(np.arange(N) / SR, s, hz)) / SR
    waver = unit(1 + np.array([wobble(50), wobble(50)]))  # one for each row of the pair
    tone = waver * np.sqrt(2) * np.sin(2 * np.pi * turns)
    wash = amp(wash_band[0][2]) * fuzzy(wash_band, rng.standard_normal((2, N)))
    return amp(only_while(list(zip(s, db)))[0]) * (tone + wash)


def far():
    """Broad rumble of flames and streets as coloured noise, with fuzzy far tones from narrow resonances."""
    # far levels, the rumble before its 8.5 dB lift: time_s, rumble_db, hum_db
    far_levels = [(0.0, -72.5, -67), (0.62, -69, -64), (1.59, -65.5, -56), (3.42, -75, -76.5),
                  (4.68, -68.5, -60.5), (6.92, -67, -67.5), (7.65, -72, -70), (8.97, -70, -65),
                  (9.67, -68.5, -75)]
    # colour of the rumble: freq_hz, relative level_db per Hz
    rumble_colour = [(18, -40.5), (30, -5.5), (59, 2.5), (134, 1.5), (648, -16.5), (779, -14),
                     (1550, -27.5), (1790, -48), (5500, -120)]
    # drone within the rumble, squared below: freq_hz, width_hz, level_db (each of one of two passes)
    drone_modes = [(65, 7.3, 2.5)]
    # far hum: freq_hz, width_hz (of one of two passes), level_db (cancelled by scaling to rms 1)
    hum_modes = [(136.6, 12, 23)]
    rumble_db, hum_db = curves(far_levels)

    def colour(hz):
        return amp(along(rumble_colour, hz)) + abs(modes(drone_modes)(hz)) ** 2

    rumble = unit(filtered(rng.standard_normal((2, N)), colour))
    hum = amp(hum_db) * fuzzy(hum_modes, rng.standard_normal((2, N)))
    return amp(rumble_db + 8.5) * rumble + hum + whine()


def scene():
    """The fire, grass and falling chips lie to the left, as do bucket, soil and distance; whistles are centred."""
    # likeness of the two ports for bucket, soil and distance: freq_hz, correlation
    ahead_alike = [(60, 0.93), (300, 0.93), (1000, 0.78), (3000, 1), (8000, 0.21)]
    ahead = knocks() + thuds() + chips() + bucket() + far()
    return pops() + rustle() + spread(ahead, ahead_alike, lag_s=.00004, pan_db=3.5) + cheeps()


def record(dry):
    """The ports favour 6.5 kHz and are dull near 8 kHz (a causal colour); the file's band limit cuts the top."""
    # colour of the microphone ports, with a dip near 730 Hz from sound off the ground, # and the file's band
    # limit above 15.6 kHz: freq_hz, level_db
    port_colour = [(20, -23), (60, -0.5), (400, 2.5), (730, -5), (1200, -0.5), (3000, -1), (5500, 3.5),
                   (6500, 7.5), (7200, -4), (8000, -14.5), (10000, -10), (13000, -2), (15600, -1.5),
                   (16200, -9.5), (17000, -30.5)]
    size, top_hz = 2 ** 12, 17097  # nothing is kept above top_hz
    grid = np.fft.rfftfreq(size, 1 / SR)
    # folding the cepstrum forward gives minimum phase
    cepstrum = irfft(np.log(amp(along(port_colour, grid))), size)
    cepstrum[1:size // 2] *= 2
    cepstrum[size // 2 + 1:] = 0
    response = np.exp(rfft(cepstrum))
    return filtered(dry, lambda hz: np.interp(hz, grid, response) * (hz < top_hz))


dry = scene()
out = record(dry)
transcribe(out)
```